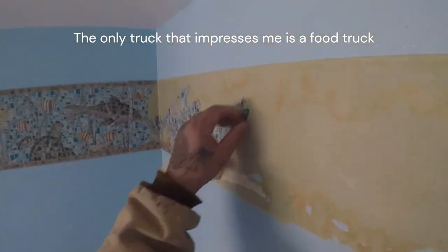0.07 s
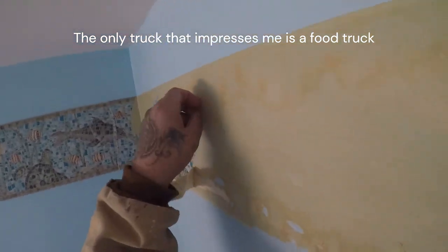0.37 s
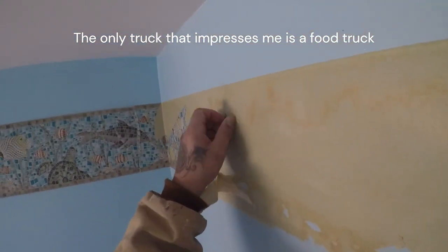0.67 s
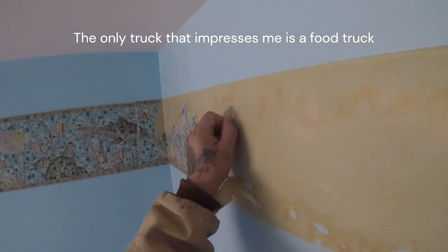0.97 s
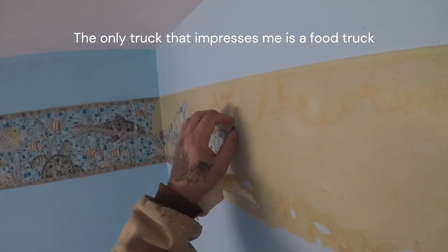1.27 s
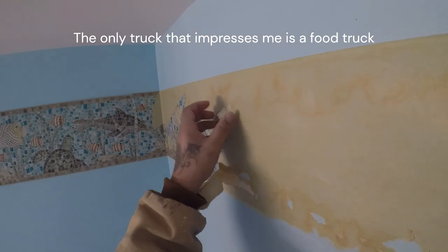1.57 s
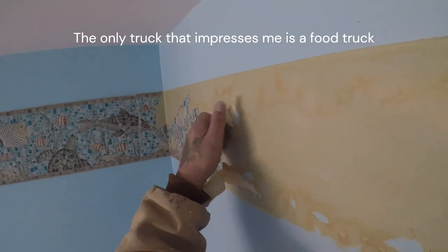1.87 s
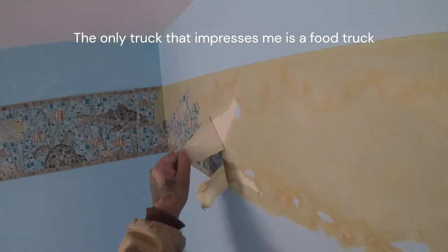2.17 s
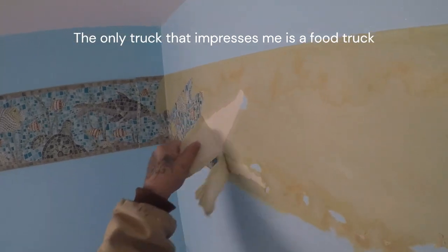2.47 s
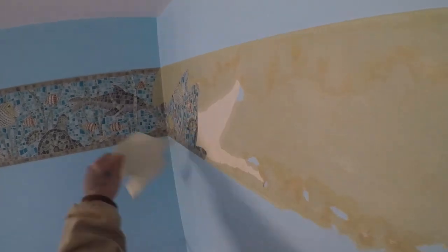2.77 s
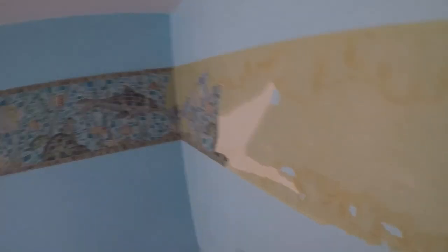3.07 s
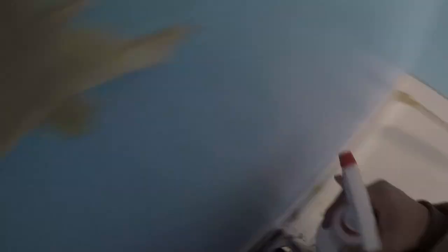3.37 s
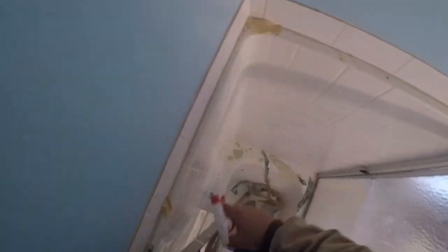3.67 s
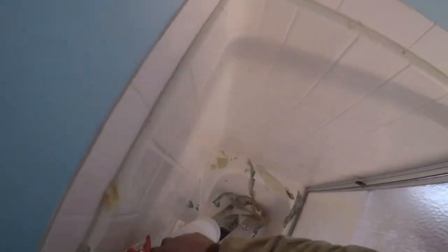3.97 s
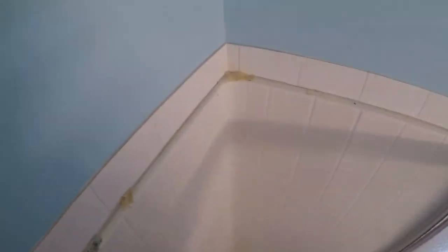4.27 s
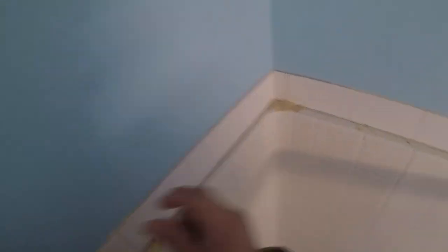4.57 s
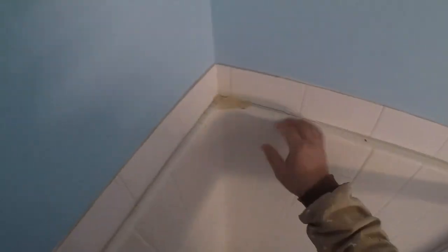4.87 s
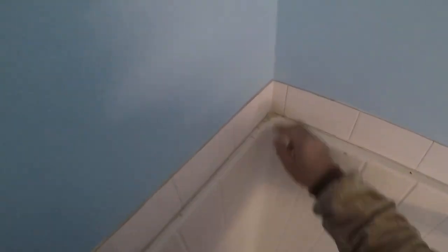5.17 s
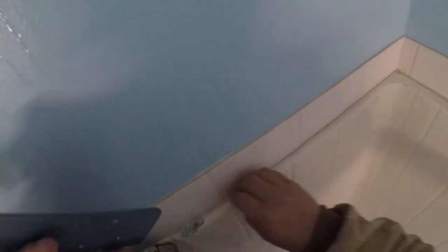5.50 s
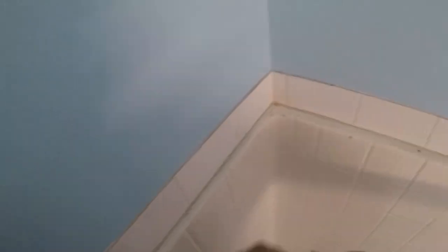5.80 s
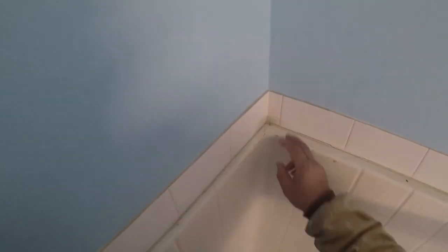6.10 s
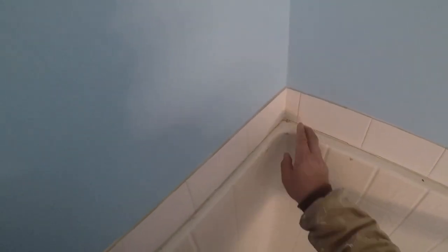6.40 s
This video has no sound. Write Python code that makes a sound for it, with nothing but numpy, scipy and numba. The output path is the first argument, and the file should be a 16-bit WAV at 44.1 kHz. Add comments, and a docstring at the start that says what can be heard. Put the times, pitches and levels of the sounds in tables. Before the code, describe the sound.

Short, close paper rips and finger bumps in a small bathroom, followed by rustling, plastic knocks, scrapes and hollow tub thumps.

```python
"""A small tiled bathroom, where wallpaper is stripped from a hollow wall close to a body-worn camera.
Glued fibres fracture in bursts, driving the loose sheet and the wall, which fingers also bump and flick.
The worker turns: the jacket rustles by stick-slip friction and the camera sways and judders on its mount.
A spray bottle and a scraper clatter, blows excite the modes of the tub and a hand wipes along the tiles.
The hard room reverberates over a low drone and microphone hiss."""
import sys
import numpy as np
from scipy import signal
from scipy.fft import rfft, irfft
from scipy.io import wavfile
from scipy.ndimage import uniform_filter1d
from numba import njit

SR = 44100
rng = np.random.default_rng(int(sys.argv[2]) if len(sys.argv) > 2 else 0)


def to_wav(s):
    """Save 16-bit WAV."""
    ch = np.atleast_2d(s).T  # columns
    pcm = np.round(np.clip(ch, -1, 1) * 32767)  # PCM
    wavfile.write(sys.argv[1], SR, pcm.astype(np.int16))


N = 284004
T = np.arange(N) / SR

# modes of the hollow wall: f/Hz, level/dB, T60/s
WALL_MODES = [(184.8, 1, 0.11), (234.5, 6, 0.09), (257.6, -7.5, 0.09), (332, -21, 0.044),
              (449, -14.5, 0.11)]
# spectrum of tearing paper: f/Hz, level/dB
TEAR_SPECTRUM = [(1410, -16), (2400, -17), (3250, -1.5), (3570, -1.5), (4170, -3.5), (5770, -1),
                 (6230, 2.5), (6980, -4), (7540, 0.5), (8210, -7.5), (9730, -6), (13000, -33)]
# spectrum of single stiff fibres cracking: f/Hz, level/dB
CRACKLE_SPECTRUM = [(2200, 4.5), (6500, -0.5), (10000, -4), (14500, -14)]
# jolts of the camera mount: t/s, thump level/dB, judder level/dB
MOUNT_JOLTS = [(2.656, -49, -39), (2.734, -28, -39.5), (2.912, -26.5, -48), (3.727, -32, -32),
               (3.844, -24, -44), (4.033, -29, -56), (4.075, -36, -36), (4.113, -21.5, -53),
               (4.174, -17, -35.5), (4.351, -17, -40), (4.548, -37, -26), (4.842, -44, -44.5)]


def undb(db):
    """Decibels to gain."""
    return 10 ** (np.asarray(db) / 20)


def unit(x):
    """Scale to rms 1."""
    return x / np.sqrt(np.mean(x ** 2))


def steady(x, size):
    """Normalisation to a running rms of 1 over size samples."""
    return x / np.sqrt(uniform_filter1d(x ** 2, size=size) + 1e-12)


def colour(x, points):
    """Minimum-phase filter through (f/Hz, level/dB) points, falling away beyond the ends."""
    size = 8192
    hz, db = np.transpose(points)
    octave = np.log2(np.maximum(np.arange(size // 2 + 1) * SR / size, 1))
    beyond = np.abs(octave - np.clip(octave, np.log2(hz[0]), np.log2(hz[-1])))
    cepstrum = irfft(np.log(undb(np.interp(octave, np.log2(hz), db) - 20 * np.minimum(beyond, 2))))
    cepstrum[1:size // 2] *= 2  # folding the cepstrum makes the filter causal
    cepstrum[size // 2 + 1:] = 0
    return signal.oaconvolve(x, irfft(np.exp(rfft(cepstrum))))[:len(x)]


def high_pass(x, hz):
    """Fourth-order attenuation below a cutoff frequency."""
    return signal.sosfilt(signal.butter(4, hz, "high", fs=SR, output="sos"), x)


@njit
def resonate(x, hz, width):
    """Second-order resonator with a moving centre frequency and a constant bandwidth in Hz."""
    y, band_state, low_state = np.empty(len(x)), 0., 0.
    for i in range(len(x)):
        g, damping = np.tan(np.pi * hz[i] / SR), width / hz[i]
        band = (band_state + g * (x[i] - low_state)) / (1 + g * (g + damping))
        band_state = 2 * band - band_state
        low_state += 2 * g * band
        y[i] = damping * band
    return y


def walk(rate):
    """Random fluctuation of rms 1, interpolated between rate values a second."""
    k = int(SR / rate)
    return unit(uniform_filter1d(np.repeat(rng.standard_normal(N // k + 1), k)[:N], k))


def grains(rate, spread_db, size=N):
    """Shot noise: on average rate impulses a second, with exponentially distributed levels."""
    strength = undb(spread_db * np.minimum(rng.exponential(size=size), 5))
    return (rng.random(size) < rate / SR) * strength * rng.choice([-1, 1], size)


def fade(t60):
    """Half a second of exponential decay, losing 60 dB in t60 seconds."""
    return np.exp(-np.log(1000) * T[:SR // 2] / max(t60, .002))


def burst(t60, points):
    """Impact noise: it builds with the contact force over a few milliseconds, then decays."""
    contact = 1 - fade(t60=0.0049)
    return colour(rng.standard_normal(SR // 2) * fade(t60) * contact, points)


def ring(modes, detune):
    """Free vibration as a sum of damped modes, each slightly detuned at every blow."""
    t = T[:SR // 2]
    return sum(undb(db) * fade(t60) * np.sin(2 * np.pi * hz * (1 + detune * rng.standard_normal()) * t)
               for hz, db, t60 in modes)


def stroke(start, attack, hold, sag_db_per_s, release_db_per_s):
    """Envelope of a gesture: a linear rise, an exponential sag while held, an exponential release."""
    t, i, gain = T[:SR], max(int(start * SR), 0), np.zeros(N)
    sag_db = sag_db_per_s * np.clip(t - attack, 0, hold)
    release_db = release_db_per_s * np.maximum(t - attack - hold, 0)
    gain[i:i + SR] = (np.minimum(t / attack, 1) * undb(-sag_db - release_db))[:N - i]
    return gain


def together(gains):
    """Incoherent sources add in power."""
    return np.sqrt(sum(g ** 2 for g in gains))


def add(track, s, sound, db):
    """Superposition of a sound at time s, its loudest 4 ms scaled to the rms level db."""
    i = int(s * SR)
    peak = np.sqrt(uniform_filter1d(sound ** 2, size=176).max())
    track[i:i + len(sound)] += (sound * undb(db) / peak)[:N - i]


def pan(left_db):
    """Channel gains for a level difference of left_db in favour of the left."""
    return undb([[left_db / 2], [-left_db / 2]])


def room(x, wet_db):
    """Direct sound, early reflections from the corner and a diffuse field in which treble lasts longest."""
    # stereo width of the camera's sound, by frequency: f/Hz, side level re mid/dB
    stereo_width = [(60, -23), (270, -36), (500, -19), (750, 2), (1100, 0), (2000, -0.5), (3700, -10),
                    (5500, -3), (8000, 2.5), (16000, -4)]
    t = T[:SR // 2]
    tails = []
    for noise in rng.standard_normal((2, len(t))):
        low = signal.sosfilt(signal.butter(1, 3000, fs=SR, output="sos"), noise)
        tail = (low * fade(t60=0.23) + (noise - low) * fade(t60=0.63)) * (t > .003)
        tails.append(tail / np.linalg.norm(tail) * undb(wet_db))
    corner = x
    for lag in rng.integers(12, 90, size=3):  # all-pass stages scatter the sound in time
        taps = np.r_[.55, np.zeros(lag - 1), 1]
        corner = signal.lfilter(taps, taps[::-1], corner)
    mid = x + signal.fftconvolve(x, tails[0])[:N]
    side = colour(corner + signal.fftconvolve(x, tails[1])[:N], stereo_width)
    return np.array([mid - side, mid + side]) / np.sqrt(1 + undb(2 * wet_db))


def through_case(x):
    """Structure-borne sound of the camera body reaches both microphones almost in phase."""
    side = signal.hilbert(x).imag * undb(-20.0)
    return np.array([x + side, x - side])


def drone_and_hiss():
    """Noise floor: the drone of the house is in phase in both channels, microphone hiss in antiphase."""
    # spectra of the drone and the hiss: f/Hz, level/dB
    drone_spectrum = [(18, -29), (30, -16), (50, -20), (92, -28), (150, 1.5), (240, -4), (524, -14),
                      (1060, -17.5), (4780, -27.5), (9390, -26), (15000, -41)]
    hiss_spectrum = [(24, -56), (40, -8), (69, -38), (91, -22), (125, -4), (173, 2.5), (257, -3), (866, -3),
                     (3070, -23.5), (12300, -27.5), (15000, -45)]
    drone = unit(colour(rng.standard_normal(N), drone_spectrum)) * undb(-53 + .5 * walk(rate=8.8))
    hiss = unit(colour(rng.standard_normal(N), hiss_spectrum)) * undb(-50)
    return np.array([drone + hiss, drone - hiss])


def pull_gain(column, release_db_per_s=328, lag_s=0):
    """Power sum of the envelopes of all pulls, at the levels in one column."""
    # pulls on the paper: t/s, rise/s, hold/s, tear level/dB, sheet level/dB, wall level/dB
    pulls = [(0.004, 0.0035, 0.048, -50.5, -54, -43.5), (0.08, 0.01, 0.15, -60.5, -68, -56),
             (0.96, 0.039, 0.014, -53, -62, -61), (1.756, 0.041, 0.024, -54.5, -67, -52),
             (1.928, 0.14, 0.18, -50, -60.5, -51), (2.05, 0.0052, 0.037, -49.5, -61, -44.5),
             (2.376, 0.066, 0.057, -42, -49, -38), (2.489, 0.057, 0.023, -47, -51, -43.5),
             (2.564, 0.021, 0.085, -45.5, -45.5, -38), (2.686, 0.019, 0.029, -47, -51.5, -43.5),
             (2.73, 0.006, 0.013, -39.5, -40, -30.5), (2.743, 0.0087, 0.028, -35.5, -44.5, -35)]
    sag_db_per_s = 39.5  # tension eases as the glue gives
    return together(stroke(row[0] + lag_s, row[1], row[2], sag_db_per_s, release_db_per_s)
                    * undb(row[column]) for row in pulls)


def peeling():
    """Fracture of glued fibres in spurts forces the loose sheet and the wall into vibration."""
    spurts = undb(2.1 * walk(rate=120))
    fibres = steady(grains(rate=6000, spread_db=1.0) * spurts, size=1500)
    crackle = unit(colour(grains(rate=210, spread_db=-1.0), CRACKLE_SPECTRUM)) * undb(-14)
    tear = (unit(colour(fibres, TEAR_SPECTRUM)) + crackle) * pull_gain(column=3)
    sheet = unit(loose_sheet(fibres)) * pull_gain(column=4)
    wall = high_pass(signal.fftconvolve(fibres, ring(WALL_MODES, detune=0.0033))[:N], hz=126)
    drum = steady(wall, size=900) * pull_gain(column=5, release_db_per_s=520, lag_s=0.013)
    return room(tear, wet_db=-14.5) + room(sheet, wet_db=-11) * pan(left_db=6.5) + room(drum, wet_db=-4.5)


def loose_sheet(fibres):
    """Heavily damped resonances of the freed paper shift as it lengthens and flexes."""
    # main resonance of the sheet: t/s, f/Hz
    main_resonance = [(0.02, 1650), (2.41, 1930), (2.46, 1810), (2.565, 1880), (2.65, 1620), (2.8, 1780)]
    # all its resonances: ratio to the main one, bandwidth/Hz, level/dB
    sheet_resonances = [(0.35, 200, -18.5), (0.72, 220, -4.5), (1.0, 970, 3.5), (1.96, 1400, -1)]
    flexing = np.exp(0.056 * walk(rate=35))
    hz = np.interp(T, *np.transpose(main_resonance)) * flexing
    out = np.zeros(N)
    for ratio, width, db in sheet_resonances:
        first_pass = resonate(fibres, hz * ratio, float(width))
        out += undb(db) * resonate(first_pass, hz * ratio, float(width))
    return out


def picking():
    """Brittle fracture: each flake a nail lifts is a decaying run of cracks, edged by stiff fibres."""
    # flakes snapping: t/s, level/dB, T60/s
    flake_snaps = [(0.0166, -39.5, 0.073), (0.5954, -55.5, 0.046), (0.767, -57, 0.13), (1.0125, -43, 0.038),
                   (1.208, -50.5, 0.071), (2.014, -49, 0.02), (2.0578, -43, 0.026), (2.071, -41.5, 0.021),
                   (2.083, -46, 0.014), (2.279, -57, 0.025), (2.325, -56, 0.032), (2.7565, -34, 0.031),
                   (2.7725, -35, 0.023), (2.7787, -37, 0.1)]
    out = np.zeros(N)
    for s, db, t60 in flake_snaps:
        cracks = grains(rate=9800, spread_db=0.5, size=SR // 2) * fade(t60)
        edge = grains(rate=2200, spread_db=2.5, size=SR // 2) * fade(t60)
        add(out, s, colour(cracks, TEAR_SPECTRUM), db)
        add(out, s, colour(edge, CRACKLE_SPECTRUM), db - 9)
    return room(out, wet_db=-17.0)


def finger_bumps():
    """Compliant contact: soft fingertips excite the hollow wall's modes with a rounded onset."""
    # bumps on the wall: t/s, level/dB
    wall_bumps = [(0.032, -36.5), (0.114, -38), (0.198, -37), (0.31, -35), (0.372, -32), (0.53, -40.5),
                  (1.289, -39), (1.405, -30), (1.628, -38.5), (2.738, -23), (3.312, -35), (3.934, -30.5),
                  (4.975, -39), (5.486, -34), (5.585, -37.5), (5.678, -39.5)]
    push = 1 - fade(t60=0.0069)
    out = np.zeros(N)
    for s, db in wall_bumps:
        add(out, s - .002, high_pass(ring(WALL_MODES, detune=0.021) * push, hz=144), db)
    return room(out, wet_db=2.0)


def flicks():
    """Sliding friction: a fingertip skids over the dry wall, its dense slips merging in a bright zip."""
    # skids: t/s, duration/s, level/dB
    skids = [(1.932, 0.022, -53.5), (5.7344, 0.014, -47)]
    # spectrum of a skid: f/Hz, level/dB
    skid_spectrum = [(2400, -16), (3400, -2.5), (5000, -7), (7000, 4), (9500, -3.5), (13000, -24)]
    gain = together(stroke(s, attack=0.0017, hold=length, sag_db_per_s=0, release_db_per_s=600) * undb(db)
                    for s, length, db in skids)
    slips = unit(colour(grains(rate=8900, spread_db=-0.5), skid_spectrum))
    return room(slips * gain, wet_db=-9.5) * pan(left_db=-2.5)


def body_motion():
    """Amplitude envelope of the worker turning and bending to the tub, at rest before and after."""
    # strength of the movement: t/s, camera sway level/dB
    movement = [(2.5, -84), (2.7, -40), (2.87, -37.5), (2.91, -33), (3.54, -50), (3.93, -28.5),
                (4.02, -21.5), (4.59, -26), (5.01, -37), (5.16, -33.5), (5.25, -47), (5.38, -45.5),
                (6.0, -63.5)]
    s, db = np.transpose(movement)
    return uniform_filter1d(undb(np.interp(T, s, db, left=-120, right=-120)), size=256)


def camera_rumble():
    """Forced vibration: body movement sways the camera; its mount judders with it and after each jolt."""
    # spectra of the sway and the judder: f/Hz, level/dB
    sway_spectrum = [(8, -30), (18, -0.5), (28, -1), (36, -7), (55, -17), (80, -19), (160, -73)]
    judder_spectrum = [(45, -17.5), (80, 9), (125, 6), (240, -8.5), (600, -39.5)]
    shakes = [stroke(s, attack=0.0049, hold=0.04, sag_db_per_s=0, release_db_per_s=164) * undb(db)
              for s, _, db in MOUNT_JOLTS]
    judder_gain = together(shakes + [body_motion() * undb(-21)])
    sway = steady(colour(rng.standard_normal(N), sway_spectrum), size=5000)
    judder = steady(colour(grains(rate=300, spread_db=1.0), judder_spectrum), size=3500)
    return through_case(sway * body_motion() + judder * judder_gain)


def rubbing():
    """Stick-slip of cloth and skin: a fine swish over a coarse scuff; the jacket rustles as it moves."""
    # strokes of sleeve and hand: t/s, duration/s, swish level/dB, scuff level/dB
    rubs = [(3.084, 0.14, -58.5, -59), (3.199, 0.12, -55, -46.5), (3.379, 0.11, -54.5, -54.5),
            (3.567, 0.28, -59, -57), (3.761, 0.039, -61, -39), (3.888, 0.047, -50, -45.5),
            (3.977, 0.09, -50, -46.5), (4.148, 0.1, -54.5, -46), (4.336, 0.19, -50, -46.5),
            (4.532, 0.05, -65, -41.5), (4.698, 0.056, -61, -49.5), (5.138, 0.25, -59, -54.5),
            (5.286, 0.069, -58, -53.5), (5.5, 0.14, -58.5, -54), (5.66, 0.073, -63, -55.5)]
    # spectra of the swish and the scuff: f/Hz, level/dB
    swish_spectrum = [(1470, 6), (2500, 2), (3450, 7.5), (4190, 2), (5970, 4.5), (7580, 4.5), (9710, -3.5),
                      (11400, -14), (15000, -51)]
    scuff_spectrum = [(180, -45), (300, 4), (404, -3.5), (545, -2), (935, -13), (1250, -7), (1650, -12.5),
                      (2360, -16), (3900, -28.5), (6600, -120)]
    attack_s, rustle_db = 0.024, -36
    swish_gains, scuff_gains = [body_motion() * undb(rustle_db)], []
    for s, length, swish_db, scuff_db in rubs:
        gain = stroke(s, attack_s, hold=max(length - attack_s, 0), sag_db_per_s=14, release_db_per_s=203)
        swish_gains.append(gain * undb(swish_db))
        scuff_gains.append(gain * undb(scuff_db))
    catch = undb(2.2 * walk(rate=60))
    swish = unit(colour(grains(rate=4400, spread_db=0.5) * catch, swish_spectrum))
    scuff = unit(colour(grains(rate=2000, spread_db=3.0) * catch, scuff_spectrum))
    return room(swish * together(swish_gains) + scuff * together(scuff_gains), wet_db=-10.0)


def mount_thumps():
    """Impulse response: each jolt sets the camera mount ringing in its low modes."""
    # modes of the mount: f/Hz, level/dB, T60/s
    mount_modes = [(29.4, 0, 0.25), (62.2, 11, 0.15), (96, -30, 0.03)]
    out = np.zeros(N)
    for s, db, _ in MOUNT_JOLTS:
        add(out, s, ring(mount_modes, detune=0.042), db)
    return through_case(out)


def hollow_bonks():
    """Damped resonance: the sheet flaps and the bottle bonks, one set of modes scaled in frequency."""
    # flaps and bonks: t/s, level/dB, frequency ratio
    bonks = [(2.739, -37.5, 1.0), (2.768, -30.5, 1.0), (2.783, -38.5, 1.38), (3.222, -42, 1.1),
             (3.297, -39.5, 1.42), (3.776, -33, .95), (3.802, -33, 1.15), (5.488, -42.5, 1.1)]
    # hollow modes at a ratio of 1: f/Hz, level/dB, T60/s
    hollow_modes = [(298, 5.5, 0.12), (469.6, 21, 0.07), (473, 8.5, 0.11), (1200, 10, 0.019)]
    out = np.zeros(N)
    for s, db, ratio in bonks:
        scaled = [(hz * ratio, mode_db, t60) for hz, mode_db, t60 in hollow_modes]
        add(out, s, ring(scaled, detune=0.015), db)
    return room(high_pass(out, hz=220), wet_db=-6.0)


def scraping():
    """Roughness excitation: grit rings the scraper's blade as each short drag swells and fades."""
    # drags: midpoint t/s, duration/s, level/dB
    drags = [(2.922, 0.03, -45.5), (3.261, 0.062, -46), (3.796, 0.05, -50), (4.405, 0.08, -40.5),
             (4.474, 0.073, -38.5), (4.551, 0.025, -42.5), (5.59, 0.034, -51)]
    # spectrum of a drag, with the blade's resonance: f/Hz, level/dB
    drag_spectrum = [(500, 8), (900, 0), (1600, 6.5), (1720, 19), (1870, -1), (2600, -0.5), (3400, 5),
                     (4400, 0), (6200, -0.5), (9000, -6), (12000, -27)]
    out = np.zeros(N)
    for s, length, db in drags:
        press = np.sin(np.pi * np.minimum(T[:SR // 2] / length, 1))
        grit = grains(rate=4000, spread_db=2.0, size=SR // 2)
        add(out, s - length / 2, colour(grit * press, drag_spectrum), db)
    return room(out, wet_db=-7.0)


def tool_knocks():
    """Impact on plastic: the contact clicks, the shell clacks and rings, and what it meets clunks."""
    # knocks of bottle and scraper: t/s, clack level/dB, click level/dB, clunk level/dB
    knocks = [(2.909, -52, -49, -42), (2.921, -45, -48, -35), (3.216, -35, -43, -64),
              (3.2193, -44, -41, -45), (3.2263, -34.5, -46, -46), (3.297, -42.5, -52, -49),
              (3.482, -56, -47.5, -56), (3.549, -52, -66, -40.5), (3.7267, -30, -54, -30),
              (3.7322, -36, -54, -33), (3.774, -45, -62, -39), (3.798, -40.5, -61, -35),
              (3.9175, -40.5, -52, -32), (4.011, -51, -49, -59), (4.069, -48.5, -55, -37.5),
              (4.401, -41.5, -44, -37), (4.575, -43, -49, -32), (4.77, -53, -58, -40.5),
              (5.102, -50, -54, -45.5), (5.161, -49, -57, -54), (5.934, -50, -68, -51),
              (5.962, -51, -56, -50)]
    # modes of the plastic shell: f/Hz, level/dB, T60/s
    shell_modes = [(1055, -1.5, 0.062), (1480, -1.5, 0.031), (1682, 0, 0.051), (1988, 0, 0.045),
                   (3245, -1.5, 0.047), (3900, 1, 0.019), (5000, -6, 0.046), (6200, -4, 0.041)]
    # spectra of the three impact noises: f/Hz, level/dB
    clack_spectrum = [(450, -9), (780, -21), (1100, -0.5), (1900, 4.5), (2700, -6), (3400, -1), (9500, -22)]
    click_spectrum = [(3000, -22), (4500, 2), (6250, 14.5), (8000, 10), (10500, -3), (14500, -28)]
    clunk_spectrum = [(70, -23.5), (130, -0.5), (240, -1), (500, -11), (1200, -23.5)]
    out = np.zeros(N)
    for s, clack_db, click_db, clunk_db in knocks:
        add(out, s, ring(shell_modes, detune=0.027), clack_db - 5.0)
        add(out, s, burst(t60=0.022, points=clack_spectrum), clack_db)
        add(out, s, burst(t60=0.037, points=click_spectrum), click_db)
        add(out, s, burst(t60=0.07, points=clunk_spectrum), clunk_db)
    return room(out, wet_db=-5)


def squeak(start_s=3.575, length_s=.115, base_hz=8400, rise_hz=950):
    """A thin, faint tone rises and falls, roughened by random frequency and amplitude modulation."""
    arch = np.sin(np.pi * np.clip((T - start_s) / length_s, 0, 1))
    hz = base_hz + rise_hz * arch ** 2 + 190 * walk(rate=600)
    gain = np.sqrt(np.abs(arch)) * undb(-64 + 3 * walk(rate=54))
    return room(np.sin(2 * np.pi * np.cumsum(hz) / SR) * gain, wet_db=-15)


def tub_blows():
    """Modal vibration: the struck tub booms; the bottle chatters on it and swells into a hollow ring."""
    # blows on the tub: t/s, boom level/dB, bottle level/dB
    thuds = [(3.729, -33, -43), (3.8, -26.5, -39), (3.928, -31.5, -57), (4.542, -19, -31),
             (4.576, -27, -27), (4.613, -21.5, -36), (4.785, -34, -46)]
    # modes of the tub and the bottle: f/Hz, level/dB, T60/s
    tub_modes = [(119.2, 10, 0.3), (135.8, 3, 0.28), (752, -23, 0.13), (1220, -20, 0.29), (1365, -30, 0.19)]
    bottle_modes = [(340, -12, 0.087), (438, -3, 0.076), (458, 7, 0.1), (553, -15, 0.2)]
    # spectrum of the chatter: f/Hz, level/dB
    chatter_spectrum = [(330, -2), (470, 7.5), (700, -4), (1270, -7.5), (2600, -22)]
    out = np.zeros(N)
    for s, boom_db, bottle_db in thuds:
        add(out, s, ring(tub_modes, detune=0.0115) * (1 - fade(t60=0.027)), boom_db)
        add(out, s - .002, ring(bottle_modes, detune=0.019) * (1 - fade(t60=0.065)), bottle_db)
        add(out, s, burst(t60=0.13, points=chatter_spectrum), bottle_db - 8.5)
    return room(out, wet_db=-4.5)


def port_puff(start_s=4.578, length_s=0.023, db=-29):
    """Wind noise: a puff of air buffets the two microphone ports in antiphase."""
    puff_spectrum = [(120, -9), (280, -3), (500, -8), (1000, -12), (2500, -28)]  # f/Hz, level/dB
    gust = rng.standard_normal(SR // 2) * np.sin(np.pi * np.minimum(T[:SR // 2] / length_s, 1))
    out = np.zeros(N)
    add(out, start_s, colour(gust, puff_spectrum), db)
    return np.array([out, -out])


def scene():
    """Linear superposition of all sources in the bathroom."""
    paper = peeling() + picking() + flicks() + finger_bumps()
    handling = tool_knocks() + scraping() + tub_blows() + hollow_bonks()
    movement = mount_thumps() + rubbing() + squeak() + camera_rumble()
    return paper + handling + movement + port_puff() + drone_and_hiss()


def record(dry):
    """The camera's response: slightly more sensitive on the right, and band-limited by a steep low-pass."""
    tilt_db, cutoff_hz = 0.32, 14800
    tilted = dry * undb([[-tilt_db], [tilt_db]])
    return signal.sosfilt(signal.ellip(8, .2, 70, cutoff_hz, fs=SR, output="sos"), tilted)


dry = scene()
out = record(dry)
to_wav(out)
```